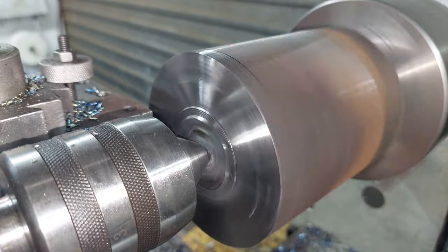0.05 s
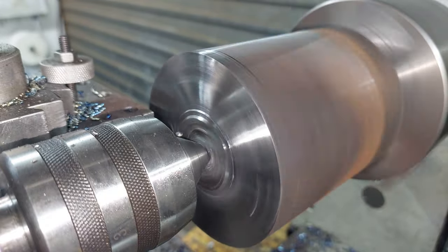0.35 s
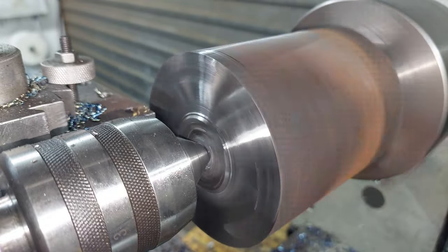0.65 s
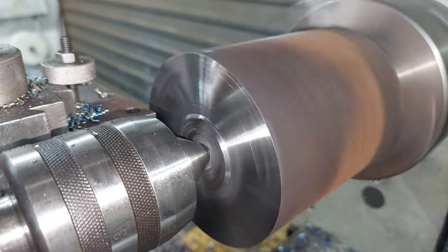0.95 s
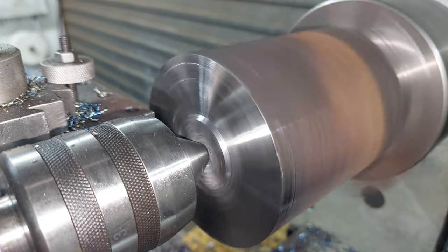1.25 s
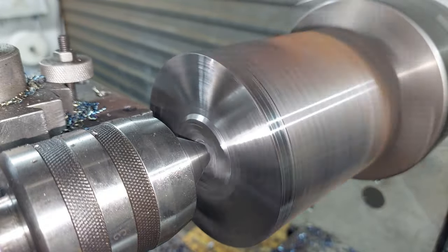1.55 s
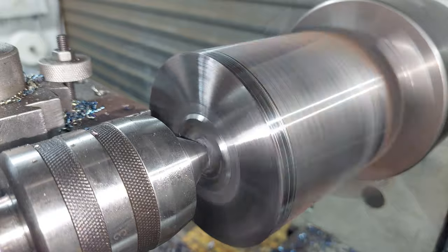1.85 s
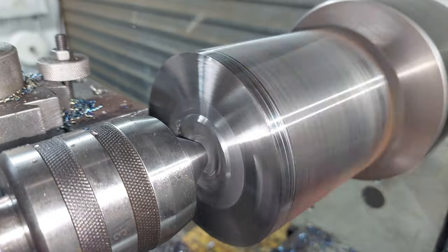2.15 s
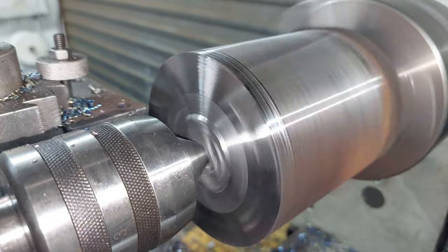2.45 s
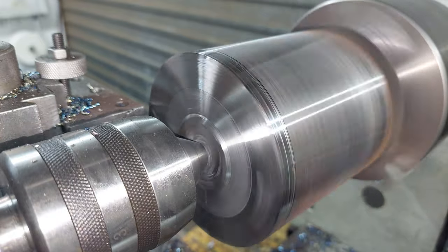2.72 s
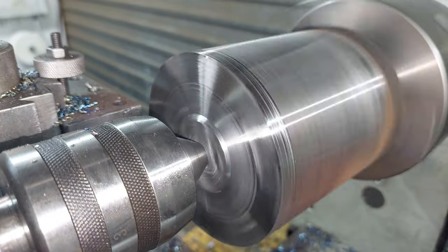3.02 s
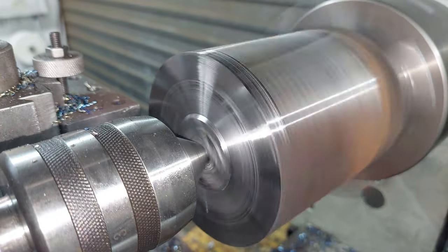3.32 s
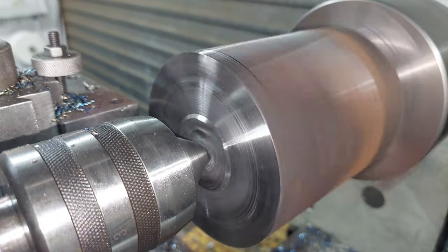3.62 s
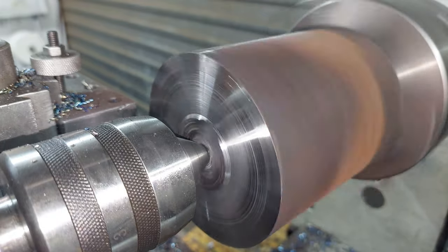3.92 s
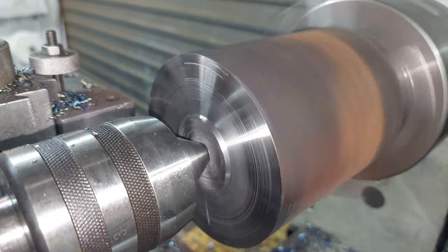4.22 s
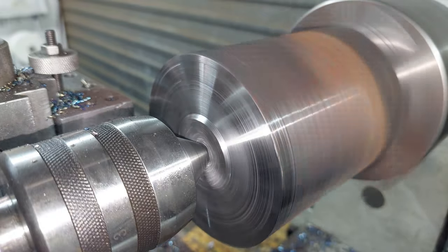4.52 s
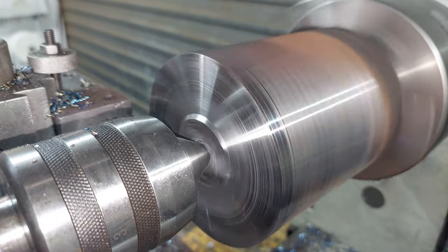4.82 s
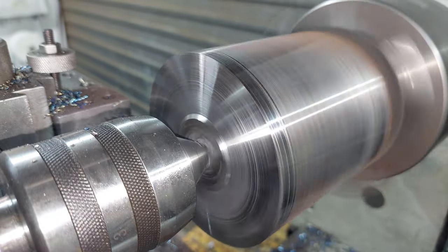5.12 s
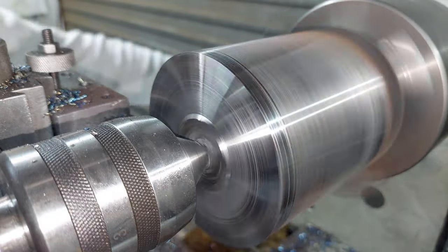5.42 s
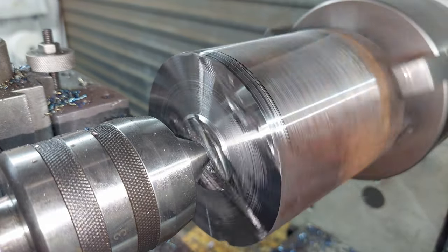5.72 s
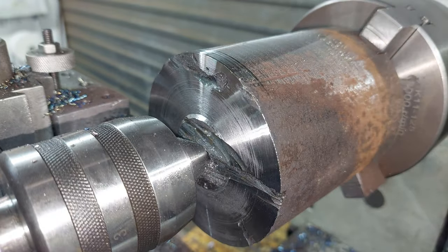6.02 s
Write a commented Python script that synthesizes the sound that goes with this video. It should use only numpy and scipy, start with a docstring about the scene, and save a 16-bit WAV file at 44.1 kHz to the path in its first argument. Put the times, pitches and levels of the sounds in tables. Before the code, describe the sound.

A metal lathe rumbles and whines as its tool hisses and crunches through spinning steel, then the spindle stops, leaving a faint hum.

```python
"""A metal lathe faces a steel bar: the headstock rumbles, meshing gears whine, and the tool hisses
and crunches as chips shear off and ring bar and holder. The cut is heavy for a second, then runs
lighter towards the centre; the tool lifts, the spindle stops, and a hum remains in the quiet shop.
Parts of the sound skip thirty times a second, which roughens the tones and leaves sharp clicks."""
import sys
import numpy as np
from scipy import signal
from scipy.fft import rfft, irfft, next_fast_len
from scipy.io import wavfile
from scipy.ndimage import uniform_filter1d

SR = 44100
rng = np.random.default_rng(int(sys.argv[2]) if len(sys.argv) > 2 else 0)


def generate_wav(sig):
    """Save sig (samples, or channels by samples) to the path in sys.argv[1] as 16-bit PCM at SR."""
    pcm = np.round(np.clip(np.atleast_2d(sig).T, -1, 1) * 32767).astype(np.int16)
    wavfile.write(sys.argv[1], SR, pcm)


N = 267687
TIME = np.arange(N) / SR
SKIPS_PER_S, SKIP_LEAD_S = 30, 0.0011
HUM_HZ = 301.5
BOOM_WIDTH_S = 0.0065

# Headstock rumble. Each row: time in seconds, level in dB.
RUMBLE_LEVEL = [(0, -21.5), (.8, -19.5), (1.0, -23), (1.06, -28.5), (1.45, -25), (1.9, -27), (2.2, -28.5),
                (2.5, -27), (3.2, -26), (3.7, -28), (3.98, -27), (4.15, -24.5), (4.9, -26.5), (5.3, -27.5),
                (5.6, -32.5), (5.76, -47), (5.85, -49)]
# Spindle load. Each row: time in seconds, load (positive in the heavy cut, negative when light or free).
SPINDLE_LOAD = [(0, 0.14), (.95, 0.45), (1.1, -0.23), (5.2, -0.19), (5.4, -0.062), (5.55, -0.58),
                (5.8, 0.025)]
# Tool travel. Each row: time in seconds, position (0 at the rim, 1 near the centre).
TOOL_TRAVEL = [(0, 0.059), (1.3, 0.05), (2.3, 0.32), (3.3, 0.64), (4.2, 0.99), (5.3, 0.95)]
# Bar and tool resonances. Each row: Hz at the rim, Hz near the centre, width in Hz,
# gain in dB at the rim, gain in dB near the centre.
STEEL_MODES = [(3230, 3260, 100, -4.5, -8), (3930, 4090, 200, -7, -10), (4900, 5170, 410, -9, -8.5),
               (5860, 5750, 380, 2, -15), (6600, 6660, 330, -3.5, -4.5), (7510, 7600, 660, 6.5, -7.5),
               (8780, 8870, 320, 9.5, -4.5), (9260, 9800, 450, 7, -9), (10240, 10000, 270, -8, -16.5),
               (10200, 10800, 470, -2, -12.5), (11400, 11750, 460, -7.5, -11.5),
               (12750, 12700, 600, -7, -16)]
# Tool holder resonances. Each row: frequency in Hz, width in Hz, gain in dB.
HOLDER_MODES = [(2455, 166, -1.5), (2564, 160, -0.5), (2756, 270, -5)]
# Rattle of gears and housing. Each row: frequency in Hz, gain in dB.
RATTLE_SPECTRUM = [(300, 8.5), (560, 4.5), (740, 8), (930, 4.5), (1150, 1), (1350, -1.5), (1850, -3.5),
                   (2200, -4.5), (3000, -10), (4200, -18), (8000, -30), (16000, -31.5)]
# Brief booms of the bed. Each row: crest in seconds, level in dB, frequency in Hz.
BED_BOOMS = [(.057, -13, 267), (.093, -12.5, 234), (.273, -18.5, 406), (.31, -17, 230), (.347, -18, 290),
             (.347, -15, 407), (.384, -14, 292), (.425, -11.5, 306), (.426, -17, 430), (.462, -14, 300),
             (.58, -16.5, 230), (.605, -14.5, 300), (0.641, -16.5, 223), (.641, -16, 410), (.671, -20, 283),
             (.715, -13.5, 285), (.725, -16, 416), (.767, -14, 276), (.894, -16.5, 317), (.917, -18, 284),
             (.991, -17.5, 306), (1.0, -17.5, 414), (1.013, -18.5, 302), (1.182, -17.5, 286),
             (1.285, -18, 302), (1.358, -14.5, 288), (1.418, -17, 275), (1.47, -15.5, 295),
             (1.809, -16.5, 281), (1.876, -16, 270), (2.376, -17, 274), (2.49, -20, 267),
             (2.603, -20.5, 193), (2.691, -18.5, 292), (2.835, -17, 286), (2.961, -18, 292),
             (3.079, -18, 290), (3.376, -21, 314), (4.107, -16, 296), (4.171, -14, 286), (4.356, -15, 294),
             (4.417, -16.5, 286), (4.638, -17.5, 308), (4.712, -16, 224), (4.948, -20, 282),
             (5.109, -17, 288), (5.139, -15.5, 278), (5.391, -18, 298), (5.452, -14, 290),
             (5.531, -19, 293), (5.573, -19, 290), (5.633, -19, 272), (5.698, -29.5, 272)]


def headstock(lumps_db=1.5, lumps_per_s=30, gather_db=5):
    """Bearings and gears shake the bed into a lumpy drone; tooth knocks rattle above it."""
    # Each row: frequency in Hz, width in Hz, gain in dB, added dB per unit load.
    bed_modes = [(100.3, 72, -14.5, -0.5), (170, 54, -16, -0.5), (221.2, 29.5, -3.5, 4.5),
                 (271.2, 17, -7, -12), (301.3, 31.2, -1, 0.5), (407, 62, -9, 6.5), (465, 82, -15.5, -8),
                 (618, 140, -23.5, 27), (909, 38, -28.5, 28)]
    # Each row: frequency in Hz, gain in dB.
    thud_spectrum = [(15, -2), (40, -3.5), (90, 5), (250, 5), (500, -6), (650, -45.5), (1200, -31),
                     (3000, -42)]
    # Each row: time in seconds, level in dB.
    rattle_level = [(0, -30), (.95, -33.5), (1.1, -39), (1.4, -35.5), (2.6, -36.5), (2.9, -38.5),
                    (3.3, -36.5), (3.75, -39), (4.24, -36.5), (5.36, -39), (5.63, -48.5), (5.69, -52.5),
                    (5.76, -61), (5.85, -79)]
    (drone_db,), (rattle_db,) = curves(RUMBLE_LEVEL), curves(rattle_level)
    (load,), (inward,) = curves(SPINDLE_LOAD), curves(TOOL_TRAVEL)
    drone_db += cut_swell_db(heavy_db=2, light_db=0.5) + lumps_db * drift(lumps_per_s)
    # the rumble gives way to each boom
    drone_db -= np.minimum(bumps([(s, gather_db) for s, _, _ in BED_BOOMS], BOOM_WIDTH_S), gather_db)
    bed = sum(from_db(db + load_db * load) * unit_rms(bandpass(white(0.95), hz, width_hz))
              for hz, width_hz, db, load_db in bed_modes)
    thud = skipping(coloured(white(0.86), thud_spectrum))
    thud_db = -12.5 + 5 * inward + 4 * np.minimum(load, 0)
    drone = steadied(bed + from_db(thud_db) * thud, window_s=0.072)
    teeth = white(0.025) * from_db(3 * drift(260))
    teeth = signal.sosfilt(signal.butter(2, 300, "high", fs=SR, output="sos"), teeth)
    rattle = coloured(teeth, RATTLE_SPECTRUM)
    return from_db(drone_db) * drone * pan(-3) + from_db(rattle_db + 1) * rattle * pan(-0.54)


def booms(gain_db=0.17):
    """A bed resonance builds up for a few cycles and sinks back."""
    out = np.zeros(N)
    for (s, db, hz), phase in zip(BED_BOOMS, rng.uniform(0, 2 * np.pi, len(BED_BOOMS))):
        out += bumps([(s, from_db(db + gain_db))], BOOM_WIDTH_S) * sine(hz, TIME - s, phase)
    return out * pan(-4.5)


def gears(speed_waver=0.00051, flutter_db=1, clean_db=1.5, rough_db=-2):
    """Meshing teeth whine at multiples of the shaft speed; skips add a rough edge."""
    # Each row: time in seconds, turns per second.
    shaft_speed = [(0, 27.3), (.6, 26.8), (1.2, 27.42), (2.1, 27.2), (3.0, 27.02), (3.8, 26.99),
                   (5.1, 27.2), (5.45, 27.5)]
    # Each row: shaft multiple (rounded in use), gain in dB, left over right in dB, right lead in radians.
    tones = [(4, -53.5, -1.5, -.5), (7, -41, -2, 0.75), (24, -41.5, 2, 1.15), (26, -50.5, 3, 3.3),
             (27, -46, -7, -0.07), (28, -47, -9, 0.3), (29, -55, -7, 3.8), (64.2, -44, 0, 3),
             (64, -46.5, -1.5, 3.5), (66.7, -51, -4.5, 4)]
    # Each row: time in seconds, level in dB.
    mesh_level = [(0, -10.5), (.9, -6.5), (1.15, -4), (5.45, -4), (5.48, -27), (5.65, -27), (5.8, -58)]
    shaft_hz = curves(shaft_speed)[0] * (1 + speed_waver * drift(24.7))
    angle = 2 * np.pi * np.cumsum(shaft_hz) / SR
    whine = np.zeros((2, N))
    for multiple, db, left_db, lead_rad in tones:
        tone = np.sqrt(2) * np.sin(round(multiple) * angle + np.array([[0], [lead_rad]]))
        whine += from_db(db + flutter_db * drift(36)) * tone * pan(left_db)
    whine = from_db(clean_db) * whine + from_db(rough_db) * skipping(whine)
    return from_db(curves(mesh_level)[0]) * whine


def chip_grains(flakes_per_s=70, flake_db=9):
    """Envelope of uneven shearing; tiny flakes break off at random and crackle."""
    grains = skipping(from_db(2 * drift(1400) + 1.37 * drift(90))[None])
    grains = unit_rms(steadied(grains, window_s=0.076))
    draws = rng.random((int(flakes_per_s * TIME[-1]), 2))
    flakes = bumps(draws * [TIME[-1], from_db(flake_db)], width_s=0.00026)
    return unit_rms(grains + flakes)


def cutting(chatter_db=2.5, waver_db=1.73, damping_db=2.5):
    """The shearing chip rings bar and holder; the bar's resonances shift as the tool feeds in."""
    # Each row: time in seconds, hiss level in dB, holder level in dB.
    cut_levels = [(0, -44.5, -40), (.55, -47, -39.5), (.92, -45.5, -39), (1.06, -49.5, -43),
                  (1.25, -46.5, -40), (1.75, -44, -38), (2.15, -43, -40.5), (2.6, -44, -43.5),
                  (3.0, -46.5, -46), (3.4, -46, -45), (4.0, -50, -48.5), (4.25, -49.5, -48.5),
                  (4.75, -49.5, -51), (5.25, -52.5, -49)]
    # The edge briefly loses its bite. Each row: time in seconds, drop of the hiss in dB.
    slips = [(1.008, 9), (1.039, 35), (1.082, 11), (1.119, 14), (1.152, 13), (1.393, 13), (1.438, 9),
             (1.516, 12), (1.558, 7), (1.874, 10), (1.947, 20), (1.991, 8), (2.027, 9), (2.307, 12),
             (2.388, 14), (3.315, -3), (3.678, 17), (3.758, 8), (4.114, 10), (4.197, 9), (4.375, 4),
             (4.474, 4), (4.816, 5), (4.911, 12), (4.994, 8)]
    # Each row: frequency in Hz, gain in dB.
    shear_spectrum = [(1200, 2.5), (2500, 10), (4500, -12), (8000, -7.5), (11000, 2.5), (13500, -7),
                      (16000, -8.5)]
    hiss_db, holder_db = curves(cut_levels)
    slip_db = bumps(slips, width_s=0.0052)
    hiss_db += 0.77 + cut_swell_db(heavy_db=-1.5, light_db=1.5) - slip_db
    holder_db += -3.1 + cut_swell_db(heavy_db=-2, light_db=1) + chatter_db * drift(130) - slip_db / 2
    inward, load = curves(TOOL_TRAVEL)[0], np.maximum(curves(SPINDLE_LOAD)[0], 0)
    grains = chip_grains()
    scrapes = [white(0.33) * grains for _ in range(2)]
    steel = 0
    for k, (rim_hz, centre_hz, width_hz, rim_db, centre_db) in enumerate(STEEL_MODES):
        ring = gliding_bandpass(scrapes[k % 2], rim_hz + (centre_hz - rim_hz) * inward, width_hz)
        ring_db = rim_db + (centre_db - rim_db) * inward + waver_db * drift(22)
        steel += from_db(ring_db) * unit_rms(ring)
    # load damps the bar; the strained tool adds its own ring
    steel = from_db(-damping_db * load) * steadied(steel, window_s=0.51)
    strain = from_db(1) * load * unit_rms(bandpass(scrapes[0], hz=5300, width_hz=1700))
    shear = from_db(-4.5 + 3 * inward) * coloured(white(0.24) * grains, shear_spectrum)
    holder = unit_rms(sum(from_db(db) * bandpass(white(0.061) * grains, hz, width_hz)
                          for hz, width_hz, db in HOLDER_MODES))
    hiss = (steel + strain) * pan(10.15) + shear * pan(3.3)
    contact = np.interp(TIME, [5.25, 5.29], [1, 0])
    return contact * (from_db(hiss_db) * hiss + from_db(holder_db) * holder * pan(5.2))


def crunches(tick_db=31, grit_db=13, width_s=0.00176, steel_db=-10, housing_db=-12):
    """A chip curl crumples and breaks: a tick in a puff of grit rings holder, bar and housing."""
    # Each row: time in seconds, level in dB.
    breaks = [(0.433, -27), (.514, -26), (.592, -29.5), (.77, -30), (.844, -29.5), (0.892, -30),
              (1.0611, -32.5), (1.284, -33.5), (1.466, -27.5), (1.543, -31), (1.8854, -38), (1.9016, -28),
              (1.9643, -30), (3.131, -39), (3.196, -31.5), (3.297, -30.5), (3.473, -31.5), (3.4905, -30.5),
              (3.5552, -30), (3.7717, -27), (3.835, -30.5), (3.853, -29), (3.917, -32.5), (4.103, -33),
              (4.134, -36), (4.197, -35), (4.2151, -36), (4.227, -37), (4.279, -32.5), (4.358, -36),
              (4.398, -32), (4.416, -35), (4.493, -37), (4.5778, -33), (4.594, -39), (4.624, -33.5),
              (4.635, -38), (4.662, -45), (4.72, -35.5), (4.77, -33.5), (4.851, -34), (4.934, -33.5),
              (4.984, -39), (5.015, -37), (5.0757, -33), (5.087, -29.5), (5.154, -31.5), (5.173, -35.5),
              (5.221, -36.5)]
    envelope = bumps([(s + width_s, from_db(db + grit_db)) for s, db in breaks], width_s)
    grit = envelope * white(0.088) * from_db(drift(740))
    for s, db in breaks:
        grit[:, int((s + width_s / 2) * SR)] += from_db(db + tick_db)
    holder = sum(from_db(db) * bandpass(grit, hz, width_hz) for hz, width_hz, db in HOLDER_MODES)
    steel = sum(from_db(db + steel_db) * bandpass(grit, hz, width_hz)
                for _, hz, width_hz, _, db in STEEL_MODES)
    housing = from_db(housing_db) * envelope * coloured(white(0.2), RATTLE_SPECTRUM)
    return holder * pan(3.3) + steel * pan(7.7) + housing


def knocks(gain_db=1, attack_s=0.0021, decay_s=0.01, clatter_db=-10):
    """Hard spots in the steel jolt the housing into a dull clank with a short clatter."""
    # Each row: start in seconds, level in dB.
    jolts = [(0.039, -22), (0.077, -21), (0.121, -16.5), (0.196, -21), (0.267, -23), (0.338, -23),
             (0.377, -18.5), (0.417, -21), (0.563, -23.5), (0.633, -14), (0.718, -14), (0.76, -24),
             (0.867, -21.5), (0.887, -16.5), (0.956, -21), (0.994, -25), (1.362, -28), (1.506, -27.5),
             (1.545, -24), (2.573, -24.5), (3.113, -24.5), (3.399, -23), (3.488, -21), (3.763, -21.5),
             (3.835, -21), (3.924, -27), (4.03, -26), (4.1, -22), (4.132, -30), (4.931, -19.5),
             (5.005, -24.5), (5.094, -20.5), (5.156, -21.5)]
    # Each row: frequency in Hz, spread between knocks in Hz, gain in dB.
    housing_modes = [(402.5, 34, 1.5), (485, 40, -4), (742, 54, -8), (916, 60, -7.5), (1142, 90, -19)]
    lowpass = signal.butter(2, 3000, fs=SR, output="sos")
    clatter = from_db(clatter_db) * signal.sosfilt(lowpass, coloured(white(0.1), RATTLE_SPECTRUM))
    out = np.zeros((2, N))
    for s, db in jolts:
        near = span(s, s + 8 * decay_s)
        age_s = TIME[near] - s
        draws = rng.uniform(-1.1, 1, (len(housing_modes), 2))
        clank = sum(from_db(mode_db) * sine(hz + spread_hz * detune, age_s, np.pi * phase)
                    for (hz, spread_hz, mode_db), (detune, phase) in zip(housing_modes, draws))
        envelope = np.exp(-age_s / decay_s) - np.exp(-age_s / attack_s)
        out[:, near] += from_db(db + gain_db) * envelope * (clank + clatter[:, near])
    return out * pan(-1.3)


def chip_snaps(ping_db=2, ping_s=0.00069, squeak_db=18):
    """In the heavy cut hard chips break with a crack and a ping, and the edge squeaks thinly."""
    # Each row: start in seconds, level in dB, ping frequency in Hz.
    snaps = [(0.0667, -38, 6400), (0.0806, -36.5, 7000), (0.1155, -29.5, 8600), (0.159, -38, 6200),
             (0.371, -35.5, 6270), (0.38, -37, 6800), (0.414, -32.5, 6540), (0.428, -47, 7200),
             (0.456, -36.5, 6400), (0.491, -41, 6150), (0.6646, -38, 6340), (0.676, -36, 6870),
             (0.7064, -38, 6250), (0.7123, -34, 6100), (0.7617, -36.5, 6950), (0.7922, -37.5, 6330),
             (0.798, -35, 5800)]
    # Each row: start in seconds, level in dB.
    edge_squeaks = [(0.035, -48), (0.048, -52), (0.0809, -48), (0.1211, -47), (0.3, -51), (0.3331, -44),
                    (0.352, -51), (0.38, -48), (0.3875, -50), (0.4194, -46), (0.428, -48), (0.6434, -50),
                    (0.711, -49), (0.75, -51)]
    pings, noise = np.zeros(N), white(0.17)
    age_s = np.arange(int(0.03 * SR)) / SR
    ping_envelope = age_s / ping_s * np.exp(1 - age_s / ping_s)
    for s, db, hz in snaps:
        start = int(s * SR)
        pings[start:start + len(age_s)] += from_db(db + ping_db) * ping_envelope * sine(hz, age_s)
    crack_envelope = sum(from_db(db) * burst(s, decay_s=0.0026) for s, db, _ in snaps)
    cracks = crack_envelope * unit_rms(bandpass(noise, hz=6500, width_hz=6000))
    squeak_envelope = sum(from_db(db + squeak_db) * burst(s, decay_s=0.0025) for s, db in edge_squeaks)
    squeaks = bandpass(squeak_envelope * noise, hz=14100, width_hz=250)
    return (pings + cracks + squeaks) * pan(14.7)


def scratches(gain_db=-1.5, narrowing=0.66):
    """Swarf drags briefly over the bar and rings its high resonances."""
    # Each row: crest in seconds, level in dB.
    drags = [(2.072, -39), (2.803, -37), (3.268, -37.5), (4.148, -39.5), (4.157, -43), (4.249, -41),
             (4.282, -41), (4.516, -38.5), (4.58, -42), (5.04, -41.5), (5.124, -41)]
    rub = white(0.27)
    ring = unit_rms(sum(from_db(db) * unit_rms(bandpass(rub, hz, narrowing * width_hz))
                        for _, hz, width_hz, _, db in STEEL_MODES))
    return bumps([(s, from_db(db + gain_db)) for s, db in drags], width_s=0.0042) * ring * pan(7.7)


def thumps(gain_db=-3, hz=48, width_s=0.0061):
    """The whole machine rocks on its feet, one slow swing at a time."""
    # Each row: centre in seconds, level in dB.
    swings = [(1.27, -29), (1.335, -29), (1.87, -40), (2.03, -34), (3.33, -37), (3.73, -40), (4.13, -30),
              (4.37, -36), (4.53, -34.5), (4.585, -40), (4.65, -28), (4.75, -35), (4.83, -29.5),
              (4.93, -34)]
    out = sum(bumps([(s, from_db(db + gain_db))], width_s) * sine(hz, TIME - s) for s, db in swings)
    return out * pan(-3.3)


def skip_clicks(step_db=10, settle_s=0.0066, faint_db=-16.5, spread_db=11):
    """The pressure jumps at each skip: a dry click, mostly faint, now and then loud."""
    # Each row: approximate time in seconds, level in dB.
    loud_clicks = [(0.03, -24.5), (0.2, -23), (0.33, -30), (0.43, -21), (0.565, -24.5), (0.6, -26),
                   (0.63, -25), (0.73, -25), (0.9, -26.5), (1.0, -25), (1.165, -30.5), (1.365, -23.5),
                   (1.5, -24.5), (1.73, -28.5), (1.865, -30.5), (2.5, -25.5), (2.865, -28), (3.13, -27),
                   (3.4, -23), (3.6, -28), (3.73, -25.5), (3.765, -28), (3.8, -29), (4.03, -30),
                   (4.1, -22.5), (4.2, -28.5), (4.265, -29), (4.43, -33), (4.765, -29.5), (4.93, -21.5),
                   (5.1, -24), (5.23, -30), (5.3, -31.5), (5.33, -39), (5.365, -37.5), (5.53, -33.5),
                   (5.565, -28), (5.6, -35), (5.63, -31.5), (5.665, -46)]
    age_s = (np.arange(-600, 600) + 0.5) / SR
    step = np.sign(age_s) * np.exp(-np.abs(age_s) / settle_s) * np.cos(2 * np.pi * HUM_HZ * age_s) / 2
    skips_s = np.arange(1, int(RUMBLE_LEVEL[-1][0] * SKIPS_PER_S)) / SKIPS_PER_S - SKIP_LEAD_S
    levels_db = np.interp(skips_s, *np.transpose(RUMBLE_LEVEL)) + faint_db
    levels_db += rng.uniform(-spread_db, spread_db, len(skips_s))
    for s, db in loud_clicks:
        levels_db[np.argmin(np.abs(skips_s - s))] = db
    out = np.zeros(N)
    for s, db, sign in zip(skips_s, levels_db, rng.choice([-1, 1], len(skips_s))):
        start = int(s * SR) - len(step) // 2
        out[start:start + len(step)] += sign * from_db(db + step_db) * step
    return out * pan(-5.5)


def wind_down(puff_db=-46, rub_db=-66):
    """A short hiss as the drive is cut, a light rub as the spindle stops."""
    # Each row: frequency in Hz, gain in dB.
    hiss_spectrum = [(1000, -9.5), (3000, 2.5), (6000, -7), (10000, -0.5), (12500, 0.5), (14500, -15),
                     (16000, -17.5)]
    puff = from_db(puff_db) * np.interp(TIME, [5.464, 5.467, 5.497, 5.505], [0, 1, 1, 0])
    rub = from_db(rub_db) * np.interp(TIME, [5.69, 5.71, 5.75, 5.79], [0.05, 0.67, 0.35, 0.05])
    return (puff + rub) * coloured(white(0.98), hiss_spectrum)


def shop(hum_db=-56.5, room_db=-62.5):
    """Steady electric hum over quiet room noise."""
    # Each row: frequency in Hz, gain in dB.
    room_spectrum = [(18, -57.5), (30, -15.5), (245, -11.5), (303, -5), (355, -17.5), (499, -14),
                     (569, -30.5), (962, -37), (13700, -58), (16000, -62)]
    hum = np.sqrt(2) * from_db(hum_db) * sine(HUM_HZ, TIME) * pan(-1)
    return hum + from_db(room_db) * coloured(white(0.55), room_spectrum)


def cut_swell_db(heavy_db, light_db, heavy_hz=3.16, light_hz=2.6, heavy_until_s=1):
    """The cut swells and eases, a little slower once it runs light."""
    heavy = heavy_db * np.cos(2 * np.pi * heavy_hz * (TIME - 0.033))
    light = light_db * np.cos(2 * np.pi * light_hz * (TIME - 0.043))
    return np.where(TIME < heavy_until_s, heavy, light)


def skipping(x, join_s=0.0017):
    """At each skip the sound crossfades to a random moment of itself."""
    slot, part = np.divmod((TIME + SKIP_LEAD_S) * SKIPS_PER_S, 1)
    slot, n = slot.astype(int), np.arange(N)
    ahead = rng.integers(0, N, slot[-1] + 2)
    blend = np.sin(np.pi / 2 * np.clip(part / SKIPS_PER_S / join_s, 0, 1)) ** 2
    return (1 - blend) * x[:, (n + ahead[slot]) % N] + blend * x[:, (n + ahead[slot + 1]) % N]


def white(correlation):
    """Stereo white noise with a given left-right correlation."""
    mid, side = rng.standard_normal((2, N))
    return unit_rms(np.sqrt(1 + correlation) * mid + np.sqrt(1 - correlation) * side * [[1], [-1]])


def drift(per_s):
    """Random wander of unit RMS."""
    knots = rng.standard_normal(int(TIME[-1] * per_s) + 3)
    return unit_rms(np.interp(TIME * per_s, np.arange(len(knots)), knots))


def coloured(x, spectrum):
    """Shape noise by (Hz, dB) rows; unit RMS."""
    hz, db = np.transpose(spectrum)
    size = next_fast_len(N)
    bins_hz = np.maximum(np.arange(size // 2 + 1) * SR / size, 1)
    gain = from_db(np.interp(np.log(bins_hz), np.log(hz), db))
    return unit_rms(irfft(rfft(x, size) * gain, size)[..., :N])


def bandpass(x, hz, width_hz):
    """A resonance passed twice for steep skirts; unit peak gain."""
    r = np.exp(-np.pi * width_hz * np.pi / 2 / SR)
    b, a = np.array([1, 0, -1]) * (1 - r * r) / 2, [1, -2 * r * np.cos(2 * np.pi * hz / SR), r * r]
    for _ in range(2):
        x = signal.lfilter(b, a, x + 1e-18)
    return x


def gliding_bandpass(x, hz, width_hz):
    """A steep resonance whose centre follows a curve."""
    carrier = np.exp(2j * np.pi * np.cumsum(hz) / SR)
    r = np.exp(-np.pi * width_hz * np.pi / 2 / SR)
    return (carrier * signal.lfilter([(1 - r) ** 2], [1, -2 * r, r * r], x * carrier.conj())).real


def steadied(x, window_s):
    """Even out slow swells."""
    return x / np.sqrt(uniform_filter1d(np.mean(x ** 2, axis=0), int(window_s * SR)) + 1e-12)


def bumps(rows, width_s):
    """A bell-shaped swell for each (seconds, height) row."""
    out = np.zeros(N)
    for s, height in rows:
        near = span(s - 4 * width_s, s + 4 * width_s)
        out[near] += height * np.exp(-((TIME[near] - s) / width_s) ** 2 / 2)
    return out


def burst(start_s, decay_s):
    """Instant attack, exponential decay."""
    age_s = TIME - start_s
    return (age_s >= 0) * np.exp(-np.clip(age_s / decay_s, 0, 20))


def curves(rows):
    """Each value column of a timed table at every sample."""
    s, *columns = np.transpose(rows)
    return [np.interp(TIME, s, column) for column in columns]


def span(start_s, end_s):
    return slice(*np.searchsorted(TIME, [start_s, end_s]))


def sine(hz, time_s, phase_rad=0):
    return np.sin(2 * np.pi * hz * time_s + phase_rad)


def pan(left_db):
    return from_db(np.array([[0.5], [-0.5]]) * left_db)


def from_db(db):
    return 10 ** (np.asarray(db) / 20)


def unit_rms(x):
    return x / np.sqrt(np.mean(x ** 2) + 1e-20)


def scene():
    """The running lathe, its cut, and the still shop after it."""
    turning = np.interp(TIME, [5.78, 5.84], [1, 0])
    machine = turning * headstock() + booms() + thumps() + gears()
    cut = cutting() + scratches() + crunches() + knocks() + chip_snaps()
    return machine + cut + skip_clicks() + wind_down() + shop()


def record(dry):
    """Steep low-pass on the top treble."""
    cutoff_hz = 15750
    return signal.sosfilt(signal.ellip(10, 0.1, 80, cutoff_hz, fs=SR, output="sos"), dry)


dry = scene()
out = record(dry)
generate_wav(out)
```